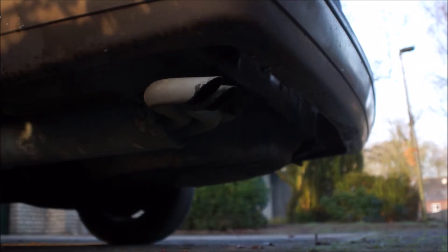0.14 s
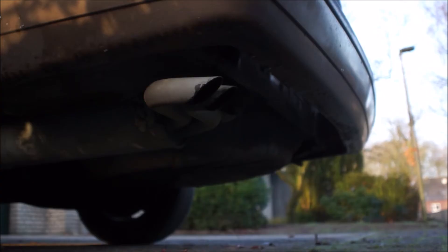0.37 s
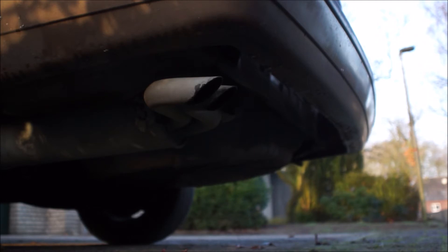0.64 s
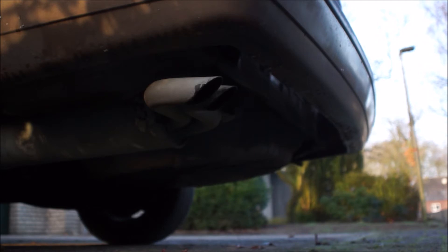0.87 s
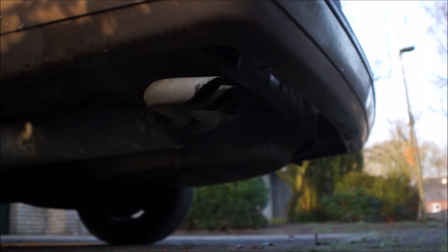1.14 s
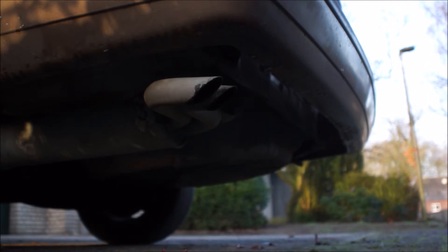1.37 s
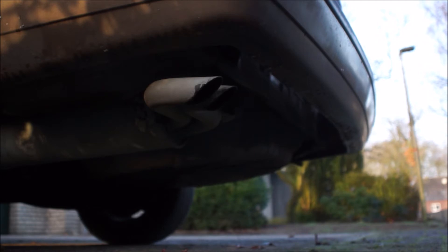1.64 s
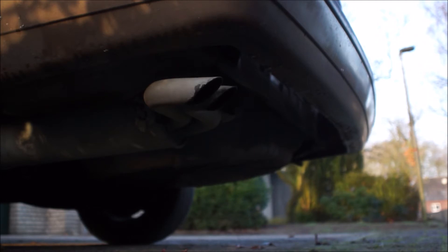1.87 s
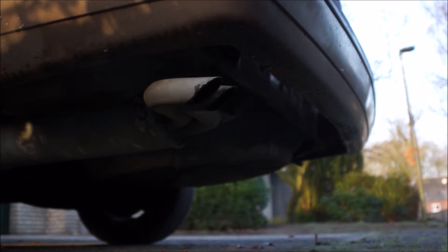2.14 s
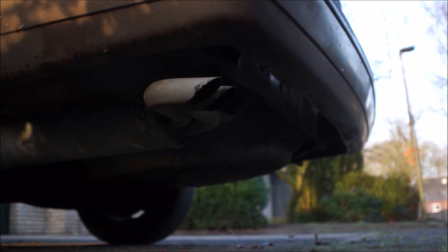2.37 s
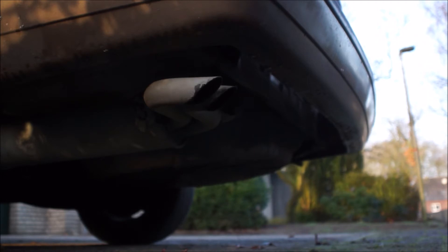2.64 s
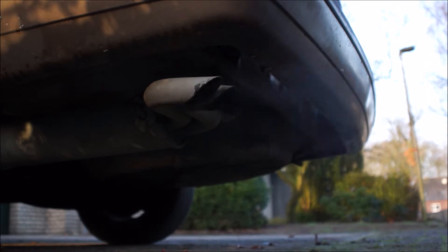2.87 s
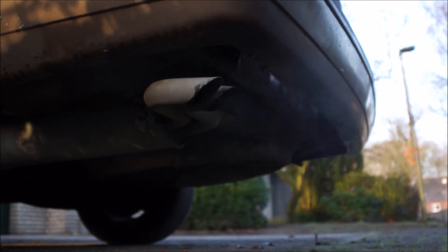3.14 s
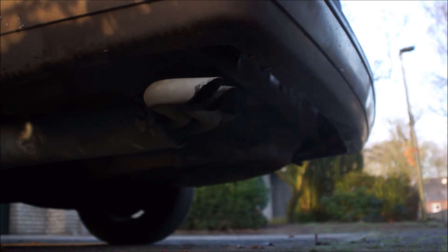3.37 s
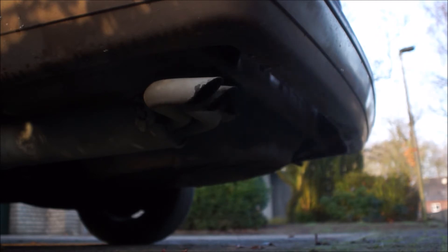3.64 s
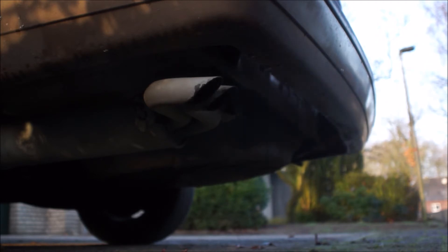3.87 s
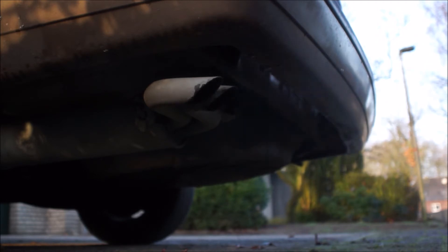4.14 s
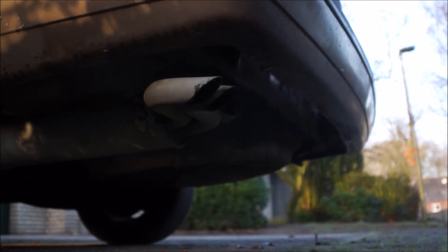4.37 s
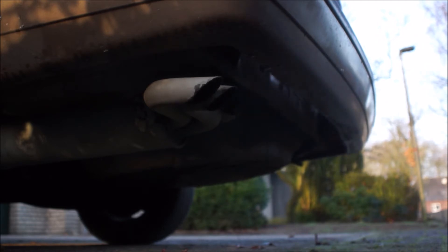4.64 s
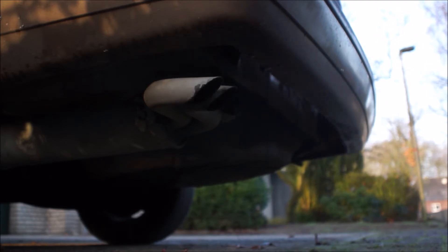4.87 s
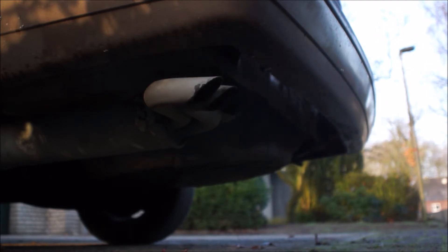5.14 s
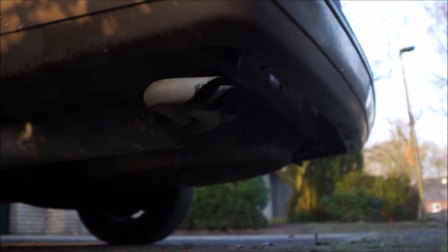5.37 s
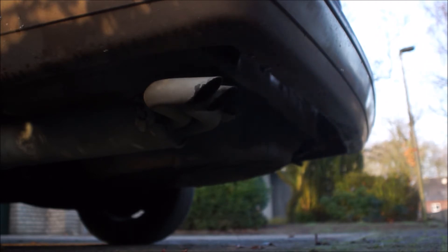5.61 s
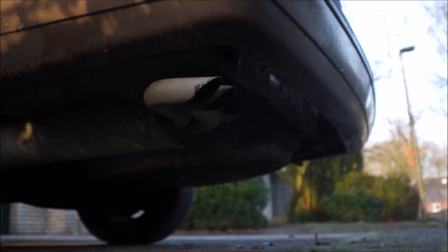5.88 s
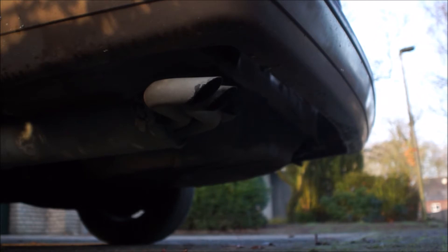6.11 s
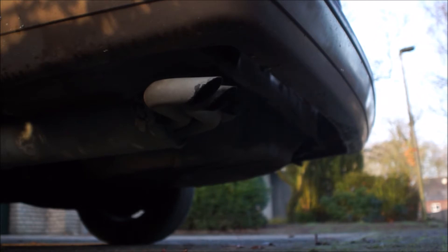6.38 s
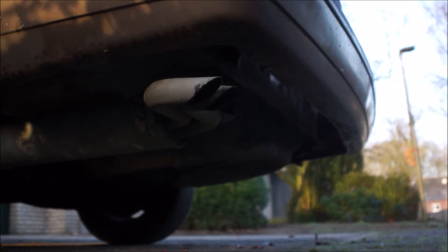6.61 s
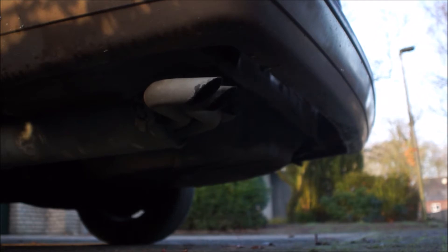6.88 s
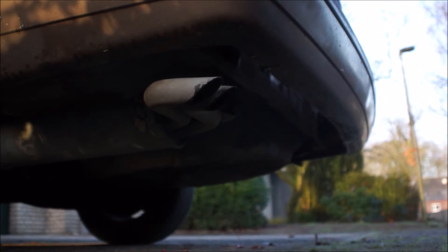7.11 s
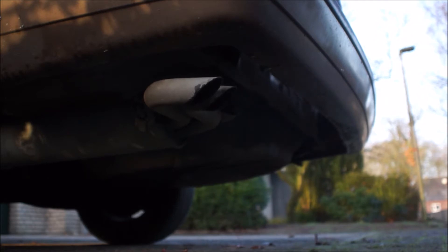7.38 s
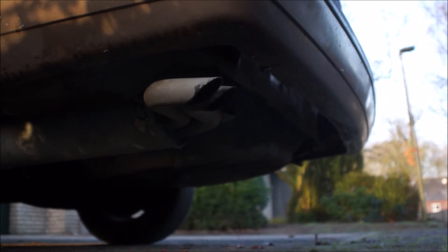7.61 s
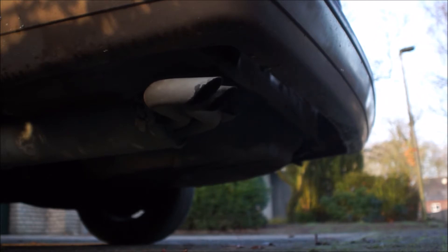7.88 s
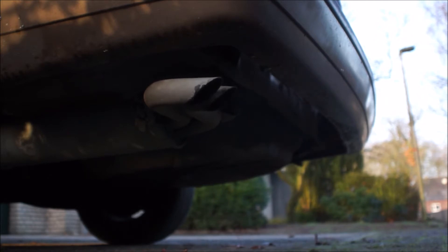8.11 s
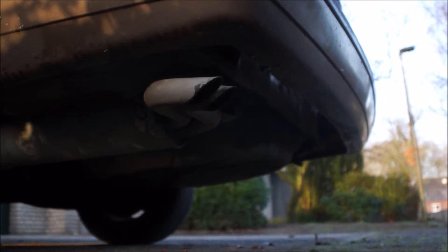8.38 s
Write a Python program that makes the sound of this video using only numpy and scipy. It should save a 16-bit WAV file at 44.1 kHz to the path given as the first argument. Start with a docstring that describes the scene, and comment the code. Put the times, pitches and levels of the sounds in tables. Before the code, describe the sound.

From 0 to 1.5 seconds there is only a very quiet wash of distant traffic. At about 1.5 seconds the starter engages with small ticks and a solid metallic clunk, then grinds and whines, its pitch sagging with compression as more clunks follow and the pinion rings faintly. Around 2.0 seconds the cold diesel catches with a loud, hard knock; the starter releases by 2.3. Firing wavers briefly, then settles near 35 knocks a second. Dull and sharp knocks alternate irregularly over dense metal clatter, a light whir and a low, puffing exhaust hum. A hollow drone swells most between 3.3 and 4.8 seconds. A thin panel buzz comes and goes, stronger near 5.3, 5.9 and 7.5. The rough idle continues steadily to the end at about 8.4 seconds, without revving or stopping. Close, low outdoor stereo behind the tailpipe, brighter on the left.

```python
"""Cold start of a six-cylinder diesel

A car is started in a quiet street, heard by a microphone pair set low behind the tailpipe, left side to the car.
The starter grinds and whines through noise, tones and a ringing pinion; clunks and combustion knocks
ring the modes of the block. The exhaust hums in tones locked to the engine cycle over low, puffed noise,
a drone swells, a body panel buzzes, and far traffic lies behind as coloured noise.
"""
import sys
import numpy as np
from scipy import signal
from scipy.fft import rfft, irfft
from scipy.io import wavfile
from scipy.ndimage import map_coordinates

SR = 44100
rng = np.random.default_rng(int(sys.argv[2]) if len(sys.argv) > 2 else 0)


def inscribe(sig):
    """Save sig as 16-bit PCM at rate SR to the path in sys.argv[1].

    A 1-D sig is mono; a 2-D sig holds one channel per row.
    Samples are clipped to [-1, 1] before scaling.
    """
    pcm = np.round(np.clip(np.atleast_2d(sig).T, -1, 1) * 32767)
    wavfile.write(sys.argv[1], SR, pcm.astype(np.int16))


N = 374850   # samples, 8.5 s


def from_db(db):
    """Decibels to gain."""
    return 10 ** (np.asarray(db) / 20)


def rms_one(x):
    """Scale to unit power."""
    return x / np.sqrt(np.mean(x ** 2) + 1e-20)


def in_time(rows, fade_s):
    """Columns joined by lines, and a gate that opens at the first row."""
    s, *columns = np.transpose(rows)
    t = np.arange(N) / SR
    gate = np.clip((t - s[0]) / fade_s, 0, 1)
    return [np.interp(t, s, c) for c in columns] + [gate]


def at_hz(points):
    """A table over frequency, read at every FFT bin along a logarithmic axis."""
    hz = np.maximum(np.arange(N // 2 + 1) * SR / N, 1)
    table_hz, value = np.transpose(points)
    return np.interp(np.log(hz), np.log(table_hz), value)


def coloured(x, spectrum):
    """Filter by a spectrum; rms 1."""
    return rms_one(irfft(rfft(x) * from_db(at_hz(spectrum)), N))


def drift(rate):
    """Slow chance of spread about 1: a smooth curve through `rate` random knots a second."""
    knots = rng.standard_normal(400)
    return map_coordinates(knots, [np.arange(N) / SR * np.clip(rate, 0, 40)], order=3)


def ring(push, hz, t60):
    """A resonance: a unit click sets a sine of height about 1 ringing, 60 dB down after t60 seconds."""
    r, w = from_db(-60 / (t60 * SR)), 2 * np.pi * hz / SR
    return signal.lfilter([0, np.sin(w)], [1, -2 * r * np.cos(w), r * r], push + 1e-18)


def dying(clicks, t60):
    """Each click leaves an envelope that decays."""
    return signal.lfilter([1], [1, -from_db(-60 / (t60 * SR))], clicks + 1e-18)


# crank speed, and the exhaust hum that goes with it:
# start_s, firing_rate_hz, hum_db (relative)
CRANK_SPEED = [(2.05, 28.0, -45), (2.2, 36.14, -39), (2.45, 33.22, -42), (2.65, 36.79, -38),
               (3, 36.93, -39), (3.5, 35.46, -38.5), (4.1, 35.52, -38), (4.7, 34.71, -38.1),
               (5.1, 34.65, -38.4), (6.5, 34.62, -38.4), (8.5, 34.72, -38.6)]


def crank():
    """The crank's turning adds up to firings counted from cylinder one, at every sample."""
    turned = np.cumsum(in_time(CRANK_SPEED, fade_s=1)[0]) / SR
    firings_at_catch = 0.84   # crank position at the first row
    return turned - turned[round(CRANK_SPEED[0][0] * SR)] + firings_at_catch


# cylinders in firing order, each with its usual knock before chance:
# level_db (relative), pitch_hz (where it rings most), treble_db (against the peak)
CYLINDERS = [(-18, 1610, -23), (-19, 1453, -22.5), (-19.5, 1104, -26), (-28.5, 950, -27.5),
             (-20, 1168, -33), (-15, 1276, -32.5)]
# hard knocks, when cold fuel lights late and all at once:
# start_s, peak_db (relative), treble_db (against the peak)
HARD_KNOCKS = [(2.011, -7, -23), (2.1576, -16, -12), (2.1821, -16, -12), (2.238, -17, -14),
               (2.3494, -15.5, -17), (2.5047, -15, -20), (2.5583, -7.5, -15), (2.6693, -8.5, -24),
               (2.7215, -6, -15), (2.887, -10.5, -18.5), (2.9702, -12, -23), (3.1638, -7, -24.5),
               (3.212, -17.5, -12), (3.3278, -10.5, -30), (3.4071, -6.5, -14.5), (3.548, -9.5, -35),
               (3.5767, -12.5, -25), (3.7145, -7.5, -14.5), (3.8858, -11, -21), (4.054, -6.5, -17),
               (4.0823, -17.5, -8), (4.1719, -9, -26), (4.4239, -12.5, -18.5), (4.5944, -12, -18.5),
               (4.709, -10, -31), (5.0836, -8.5, -19.5), (5.113, -14.5, -17.5), (5.2574, -13.5, -38),
               (5.4, -12, -36), (5.4299, -14.5, -20), (5.6038, -7, -17), (5.6328, -13.5, -15),
               (5.7777, -9.5, -15.5), (5.8083, -10.5, -16.5), (5.896, -13, -27), (5.978, -13.5, -18),
               (6.1234, -9, -14.5), (6.1522, -14, -14), (6.297, -15, -18), (6.3267, -16.5, -12),
               (6.353, -9.5, -26), (6.41, -10, -27), (6.4372, -9, -30), (6.6426, -10, -23.5),
               (6.6724, -11, -27), (6.7861, -8.5, -38), (6.8172, -17, -19), (6.9893, -6.5, -20.5),
               (7.0206, -15, -13.5), (7.3358, -9, -22), (7.5394, -10, -18), (7.5659, -11, -37),
               (7.8549, -5, -18), (7.9127, -12, -37), (8.0288, -9.5, -14), (8.142, -12, -30),
               (8.2005, -9.5, -26), (8.3731, -7, -15.5)]
# clunks while the starter engages and cranks, and a bounce just after the first hard knock:
# start_s, peak_db (relative), pitch_hz (where it rings most), treble_db (against the peak)
CLUNKS = [(1.5076, -32, 1520, -5), (1.5286, -24, 1660, 0), (1.549, -11, 960, -26), (1.7113, -24, 1500, -21),
          (1.7353, -20.5, 1470, -15), (1.8861, -19.5, 1040, -12), (1.907, -21, 1570, -7),
          (2.026, -15.5, 1630, -27)]


def knock_list():
    """One knock a firing, in its cylinder's manner and never twice alike; hard knocks and clunks are given."""
    timing_spread_s, level_spread_db, pitch_spread_octaves, treble_spread_db = 0.001222, 2, 0.082, 4
    firings, t = crank(), np.arange(N) / SR
    number = np.arange(int(firings[-1]) + 1)
    chance = np.minimum(rng.standard_normal((len(number), 4)), 1.3)
    level_db, pitch_hz, treble_db = np.array(CYLINDERS)[number % 6].T
    rows = np.c_[np.interp(number, firings, t) + timing_spread_s * chance[:, 0],
                 level_db + level_spread_db * chance[:, 1],
                 pitch_hz * 2 ** (pitch_spread_octaves * chance[:, 2]),
                 treble_db + treble_spread_db * chance[:, 3]]
    # a hard knock takes the place of the nearest firing and keeps its cylinder's pitch
    hard = np.array(HARD_KNOCKS)
    nearest = np.round(np.interp(hard[:, 0], t, firings)).astype(int)
    rows[nearest[:, None], [0, 1, 3]] = hard
    return np.r_[CLUNKS, rows[rows[:, 0] < t[-1]]]


# ringing modes of the block and covers: pitch_hz, level_db (relative), t60_s
BLOCK_MODES = [(365.5, -10, 0.077), (437, -6.5, 0.047), (525, -8.5, 0.12), (571.5, -11, 0.14),
               (952, -5, 0.081), (996.6, -6.5, 0.16), (1134.6, 1, 0.049), (1227, -5.5, 0.13),
               (1316, -6, 0.046), (1363, -1, 0.073), (1459, -5, 0.035), (1520, 1.5, 0.025),
               (1605, -1.5, 0.054), (1720, -1, 0.047), (1816, -3.5, 0.054), (1876, -15.5, 0.058),
               (2073, -3.5, 0.018), (2340, -8.5, 0.022), (2338, -10.5, 0.05), (2725, -25.5, 0.061),
               (2975, -11, 0.025), (3080, -14, 0.037), (3460, -21.5, 0.036), (4240, -15, 0.023),
               (4570, -18, 0.018), (4780, -16.5, 0.042), (5050, -21, 0.024)]
# colour of the noisy edge of a knock: pitch_hz, level_db (per Hz, relative)
CRACK_COLOUR = [(800, -42), (2000, -13), (3000, 2), (4700, -6), (6000, -3), (8000, -12.5), (11500, -36)]
# valve gear between the knocks: start_s, clatter_db (relative), whir_db (relative)
VALVE_GEAR = [(1.5, -53, -61), (1.56, -25.5, -48), (1.7, -28, -39), (1.93, -33, -48.5), (2.18, -34, -34),
              (2.32, -34, -39), (2.73, -24.5, -37), (4.6, -24.5, -39.5), (5.3, -25.5, -41),
              (8.5, -25.5, -39.5)]
# colour of the valve gear's whir: pitch_hz, level_db (per Hz, relative)
WHIR_COLOUR = [(470, -24), (800, -10), (978, -9), (1060, -4), (1340, -10.5), (1650, -5), (2000, -16),
               (2360, -9.5), (2550, -12), (3050, -12), (10500, -32), (11100, -37.5), (11500, -110),
               (15000, -99), (22000, -120)]


def block(knock_rows):
    """Each knock is a steep pressure rise and a rough afterburn; steady clatter rings the same modes."""
    s, peak_db, favoured_hz, treble_db = knock_rows.T
    at = np.round(s * SR).astype(int)
    clatter_db, whir_db, turning = in_time(VALVE_GEAR, fade_s=0.0048)
    chance = rng.standard_normal((len(s), len(BLOCK_MODES)))
    heavy_walls, stiff_parts, clatter = np.zeros((3, N))
    # small impacts, about 300 a second, shared by all modes
    taps = (rng.random(N) < 300 / SR) * rng.random(N)
    grains = rms_one(0.4 + dying(taps, t60=0.008))
    for k, (hz, db, t60) in enumerate(BLOCK_MODES):
        stiff = hz > 2500
        # the cylinder's place favours some modes
        nearness = np.exp(-(np.log2(hz / favoured_hz) / 0.29) ** 2)
        # hard knocks reach the small stiff parts
        brightness = stiff * (treble_db + 31.5)
        blows = np.zeros(N)
        blows[at] = from_db(peak_db + db - 20 + 11.95 * nearness + brightness + 1.8 * chance[:, k])
        rough = rng.standard_normal(N) * grains
        afterburn = dying(blows, t60=0.094) * rough
        rung = ring(0.54 * blows + 0.071 * afterburn, hz, t60)
        if stiff:
            stiff_parts += rung
        else:
            heavy_walls += rung
        # the same grains serve the clatter, moved by 9000 samples
        clatter += from_db(db - 24 * stiff) * ring(np.roll(rough, shift=9000), hz, t60)
    # the walls take a few cycles to get going and lose their sharp edge
    wall_band = signal.butter(4, [420, 2500], "band", fs=SR, output="sos")
    stiff_band = signal.butter(2, [2200, 7000], "band", fs=SR, output="sos")
    knocks = signal.sosfilt(wall_band, heavy_walls) + signal.sosfilt(stiff_band, stiff_parts)
    cracks = np.zeros(N)
    cracks[at] = from_db(peak_db + treble_db - 6)
    crack = dying(cracks, t60=0.079) * coloured(rng.standard_normal(N), CRACK_COLOUR)
    whir = from_db(whir_db + 5 + 1.6 * drift(25)) * coloured(rng.standard_normal(N), WHIR_COLOUR)
    # parts rattle most just after a firing
    shaken = np.zeros(N)
    shaken[at] = from_db(0.28 * (peak_db + 11))
    loose = 0.8 + dying(shaken, t60=0.09)
    clatter = from_db(clatter_db - 4.5 + 2.4 * drift(30)) * rms_one(loose * clatter)
    return knocks + crack + turning * (clatter + whir)


# exhaust tones; unlike cylinders fill in between the firing tones:
# order (multiple of the six-firing cycle rate), level_db (relative)
EXHAUST_TONES = [(6, -42), (12, -6.5), (15, -18), (17, -14), (18, 3.5), (19, -28), (20, -16), (21, -5),
                 (22, -19.5), (23, -6), (24, -4), (25, -18), (26, -4.1), (27, 1), (28, -20), (29, -8),
                 (30, -1), (31, -10.5), (32, -15), (33, -5), (34, -18.5), (35, -12.5), (36, -19), (38, -8),
                 (39, -12), (42, -10.5), (43, -17), (45, -9), (49, -11.5), (51, -10.5), (53, -7.5)]
# low noise: the starter's clunk at 1.56 s, then puffs of exhaust flow from about 1.9 s:
# start_s, level_db (relative)
LOW_NOISE = [(1.5, -67), (1.56, -30.5), (1.65, -51), (1.85, -47), (1.91, -40.5), (2.14, -33.5),
             (2.18, -25.5), (2.44, -34), (2.6, -30), (3.3, -33), (3.7, -33), (8.5, -33)]
# colour of the low noise before its filters: pitch_hz, level_db (per Hz, relative)
LOW_NOISE_COLOUR = [(24, -50.5), (40, -23), (54, -21.5), (75, -18), (102, -2.5), (129, -6.5), (161, 3.5),
                    (215, -5), (253, 3.5), (334, -3.5), (426, -4), (473, -9), (519, -8.5), (563, -13.5),
                    (640, -3.5), (830, -30), (1410, -120)]


def exhaust():
    """Tones on the engine cycle, and low noise beating at the firing rate: a starter clunk, then puffs of flow."""
    _, hum_db, running = in_time(CRANK_SPEED, fade_s=0.031)
    firings = crank()
    # delay of the exhaust wave in the pipe, in cycles
    cycles = firings / len(CYLINDERS) + 0.468
    hum = np.zeros(N)
    for order, db in EXHAUST_TONES:
        level = from_db(db + 1.7 * drift(4.4))
        # the long pipe lets the higher tones out first, so each cycle sweeps downward
        turns = order * cycles + 0.026 * order ** 2 + 0.74 + 0.065 * drift(6.2)
        hum += level * np.sin(2 * np.pi * turns)
    noise_db, sounding = in_time(LOW_NOISE, fade_s=0.017)
    beat = 1 + 0.084 * np.sin(2 * np.pi * (firings + 0.81))
    noise = coloured(beat * rng.standard_normal(N), LOW_NOISE_COLOUR)
    # once running, the muffler holds back the deep part of the flow noise
    muffler = signal.butter(2, 220, fs=SR, output="sos")
    noise = noise - 0.47 * running * signal.sosfiltfilt(muffler, noise)
    # the small pipe mouth radiates little deep bass
    mouth = signal.butter(4, 75, "high", fs=SR, output="sos")
    noise = signal.sosfilt(mouth, noise)
    noise_level = from_db(noise_db - 1 + 1.3 * drift(5.2))
    return running * from_db(hum_db - 2) * hum + sounding * noise_level * noise


# swells in pipe and floor pan, as the firing rate wanders past their resonances:
# start_s, length_s, pitch_hz, level_db (relative)
DRONE_SWELLS = [(2.23, 0.28, 265, -41), (2.462, 0.18, 255.4, -41), (2.7, 0.6, 263, -40.5),
                (2.654, 1, 439.6, -42.5), (3.345, 1, 262, -35), (4.184, 0.68, 262, -39)]


def drone():
    """Each resonant swell is a slightly unsteady tone that rises, holds and fades."""
    t, waver, out = np.arange(N) / SR, 0.086 * drift(8), 0
    for s, length, hz, db in DRONE_SWELLS:
        part = (t - s) / length
        # rises over 11 % of its length, fades over the last 40 %
        swell = np.clip(np.minimum(part / 0.11, (1 - part) / 0.4), 0, 1)
        out = out + from_db(db) * swell * np.sqrt(2) * np.sin(2 * np.pi * (hz * t + waver))
    return from_db(3.3 * drift(10)) * out


# body panel buzz: start_s, level_db (relative)
PANEL_BUZZ = [(1.5, -46), (1.58, -21.5), (1.67, -52), (1.77, -30), (1.97, -46), (2.22, -39), (3.3, -34.5),
              (4.2, -33), (5.25, -30.5), (5.6, -35), (5.92, -27), (7.2, -33), (7.54, -29.5), (8.5, -35.5)]


def panel(knock_rows):
    """A thin panel sings on one mode, shaken afresh by every knock."""
    buzz_db, shaken = in_time(PANEL_BUZZ, fade_s=0.036)
    blows = np.zeros(N)
    blows[np.round(knock_rows[:, 0] * SR).astype(int)] = from_db(0.42 * (knock_rows[:, 1] + 9))
    flicker_db = 1.5 * drift(4)
    shake = (0.5 + dying(blows, t60=0.052)) * rng.standard_normal(N)
    buzz = rms_one(ring(shake, hz=680.2, t60=0.067))
    return shaken * from_db(buzz_db - 1 + flicker_db) * buzz


# grinding of the starter: start_s, level_db (relative)
STARTER_GRIND = [(1.505, -38), (1.533, -23), (1.553, -24), (1.589, -43), (1.815, -44), (1.837, -38),
                 (2.153, -34.5), (2.183, -29), (2.28, -44)]
# colour of the grinding teeth: pitch_hz, level_db (per Hz, relative)
TEETH_COLOUR = [(880, -18.5), (1500, -9), (1660, -7), (2000, -11.5), (2590, -11.5), (2840, -10),
                (5160, -14), (10700, -32.5), (11200, -51), (11500, -67), (15000, -94), (22000, -120)]
# gear mesh and pinion: start_s, pitch_hz (whine, before its wobble), whine_db, pinion_db
STARTER_WHINE = [(1.57, 980, -48, -50), (1.62, 1170, -32, -52), (1.67, 1240, -37, -51),
                 (1.72, 1450, -54, -41), (1.75, 1320, -26, -42), (1.81, 1030, -29.5, -46),
                 (1.85, 950, -56, -46), (1.89, 1050, -43, -44), (1.95, 1250, -51, -39),
                 (2.28, 1700, -62, -40)]
# ringing modes of the pinion: pitch_hz, level_db (relative), t60_s
PINION_MODES = [(2930, 0, 0.18), (3460, -3, 0.045), (4400, -6, 0.055), (5200, -10, 0.13)]


def starter():
    """Grinding teeth, a mesh whine that sags under each compression, and the ringing pinion."""
    grind_db, engaged = in_time(STARTER_GRIND, fade_s=0.0056)
    whine_hz, whine_db, pinion_db, turning = in_time(STARTER_WHINE, fade_s=0.01)
    grind = from_db(grind_db + 2 + 2.7 * drift(34.54)) * coloured(rng.standard_normal(N), TEETH_COLOUR)
    # the pitch wobbles by 18 Hz rms
    wobble_hz = 18 * rms_one(ring(rng.standard_normal(N), hz=37.4, t60=0.038))
    mesh = np.cumsum(whine_hz + wobble_hz) / SR
    whine = (1 + 0.62 * drift(38.23)) * np.sin(2 * np.pi * mesh)
    # a second gear pair, at 1.35 times the pitch
    whine = whine + 0.5 * np.sin(2.7 * np.pi * mesh)
    pinion = sum(from_db(db) * rms_one(ring(rng.standard_normal(N), hz, t60))
                 for hz, db, t60 in PINION_MODES)
    released = np.clip((STARTER_GRIND[-1][0] - np.arange(N) / SR) / 0.032, 0, 1)
    gears = from_db(whine_db) * whine + from_db(pinion_db) * pinion
    return released * (engaged * grind + turning * gears)


def car(knock_rows):
    """All that sounds in the car adds up."""
    return exhaust() + drone() + panel(knock_rows) + starter() + block(knock_rows)


# likeness of the car at the two microphones: pitch_hz, likeness (0 to 1)
CAR_LIKENESS = [(60, 1), (125, 0.87), (250, 0.82), (500, 0.72), (1000, 0.68), (2000, 0.13), (4000, 0.67),
                (8000, 0.62), (11000, 0.22)]
# balance of the car between the microphones: pitch_hz, level_db (left over right)
CAR_BALANCE = [(60, -6), (110, 3.5), (190, 2.5), (340, 1.5), (610, 6.5), (1100, 12), (1970, 11.5),
               (3520, 10.5), (6290, 10), (11200, 0.5)]


def under_car(near, far):
    """The right side is shadowed, hears late, and gets part of the sound from other faces of the car."""
    alike, shade = np.clip(at_hz(CAR_LIKENESS), 0, 1), from_db(-at_hz(CAR_BALANCE))
    right_late_s = 0.000045
    late = np.exp(-2j * np.pi * np.arange(N // 2 + 1) * SR / N * right_late_s)
    left = rfft(near)
    right = shade * late * (alike * left + np.sqrt(1 - alike ** 2) * rfft(far))
    # evens out the mean of the two sides
    return irfft([left, right] / (0.5 + 0.5 * shade * alike), N)


# colour of far traffic: pitch_hz, level_db (per Hz, relative)
STREET_COLOUR = [(18, -64), (30, -40), (65, -25), (151, -14), (237, -11.5), (262, -11), (327, -5),
                 (390, -12.5), (430, -7), (475, -8), (1030, -6.5), (2710, -21), (10400, -28), (11500, -36),
                 (15000, -73), (22000, -120)]
# likeness of the street at the two microphones: pitch_hz, likeness (-1 to 1)
STREET_LIKENESS = [(60, 0.89), (170, 0.93), (490, 0.58), (1390, 0.091), (3950, -0.29), (11200, 0.2)]


def street():
    """Far traffic as coloured noise, alike on both sides mainly in the bass."""
    mid, side = rfft(rng.standard_normal((2, N))) * from_db(at_hz(STREET_COLOUR))
    alike = np.clip(at_hz(STREET_LIKENESS), -1, 1)
    common, opposed = np.sqrt(1 + alike) * mid, np.sqrt(1 - alike) * side
    return from_db(-53) * rms_one(irfft([common + opposed, common - opposed], N))


def scene():
    """Car and street; both microphones hear the same knocks, with roughness of their own."""
    knock_rows = knock_list()
    return under_car(near=car(knock_rows), far=car(knock_rows)) + street()


def top_cut(x):
    """Nothing passes above the cut-off."""
    return signal.sosfilt(signal.butter(12, 11850, fs=SR, output="sos"), x)


def record(dry):
    """Peaks are rounded, then the top is cut by a steep low-pass."""
    rounded = 1.122 * np.tanh(dry / 1.26)
    low_pass = signal.cheby2(14, 50, 11900, fs=SR, output="sos")
    mix = signal.sosfilt(low_pass, rounded)
    return top_cut(mix)


dry = scene()
out = record(dry)
inscribe(out)
```